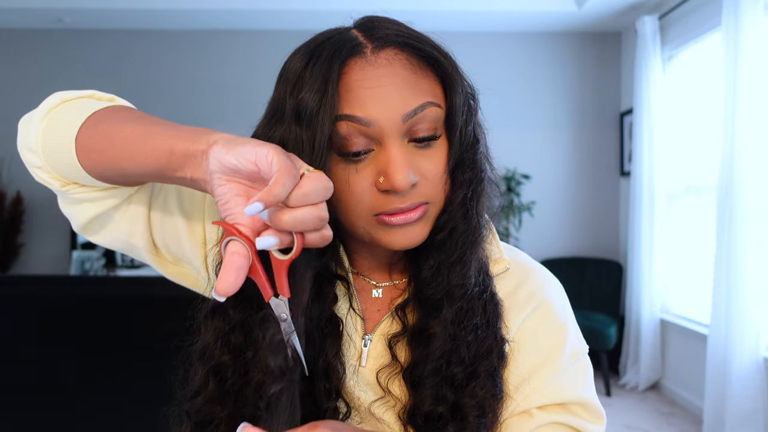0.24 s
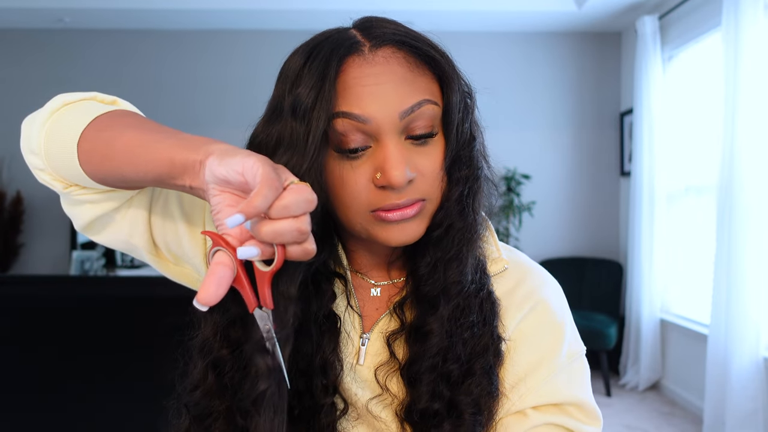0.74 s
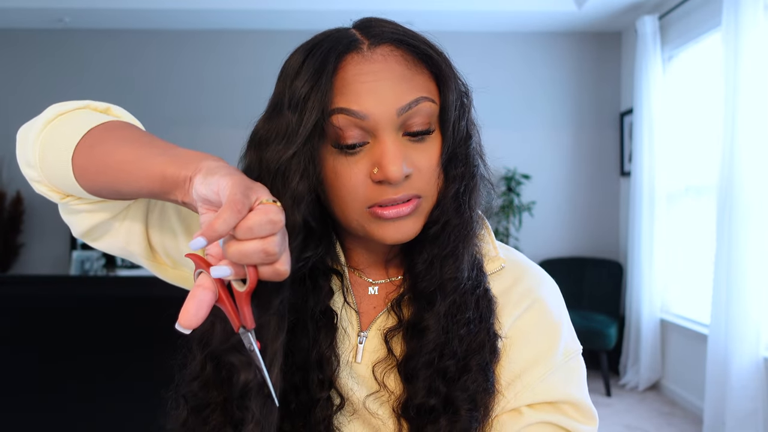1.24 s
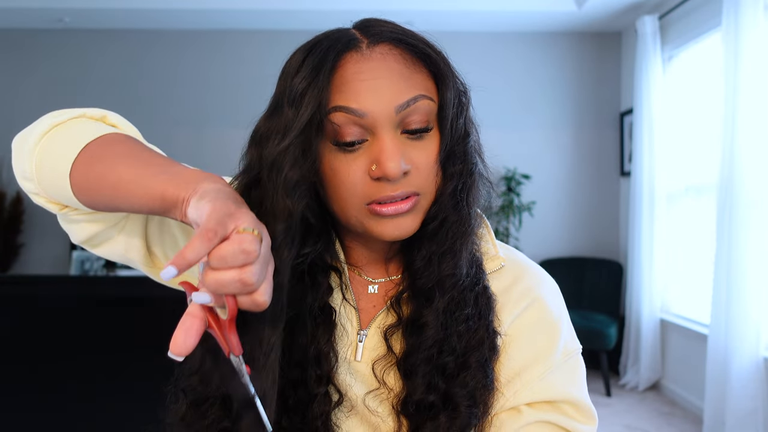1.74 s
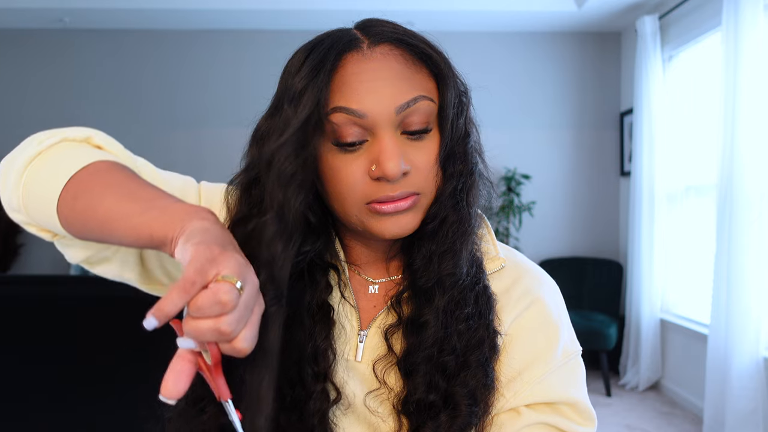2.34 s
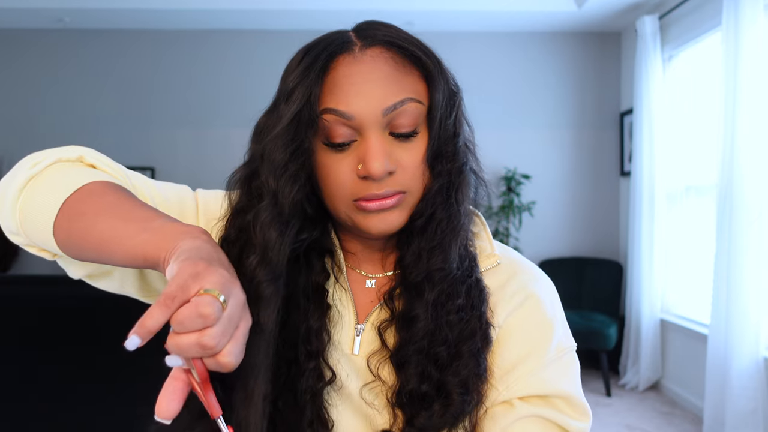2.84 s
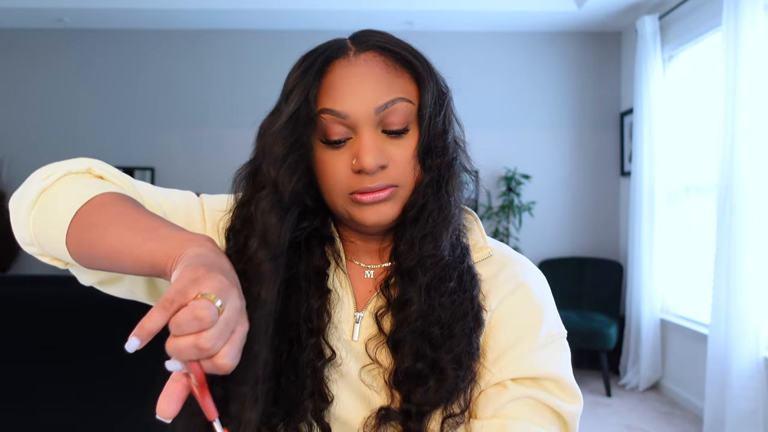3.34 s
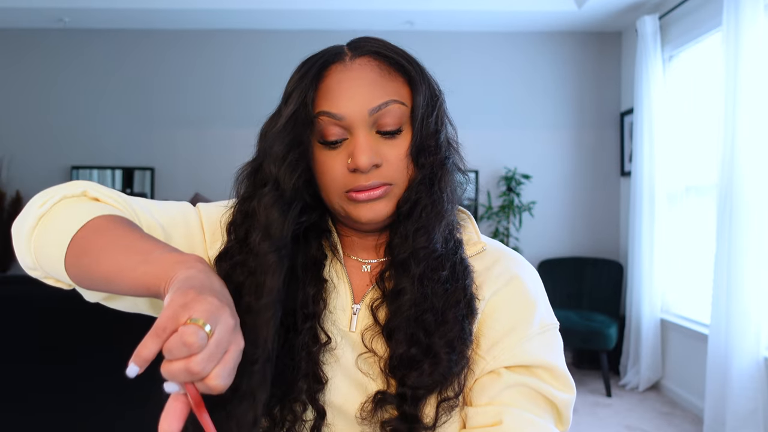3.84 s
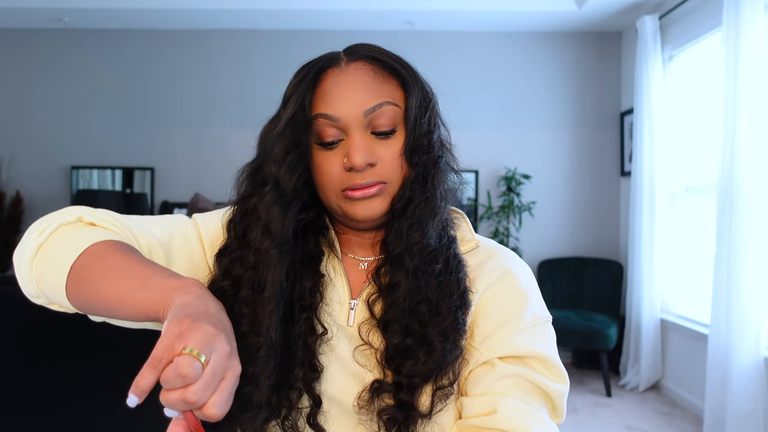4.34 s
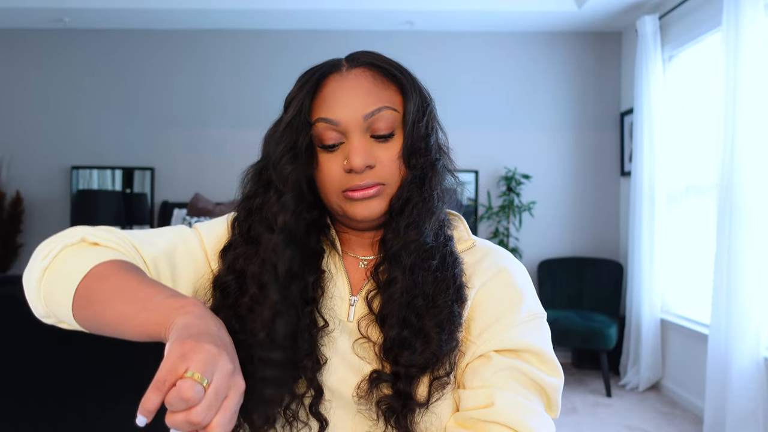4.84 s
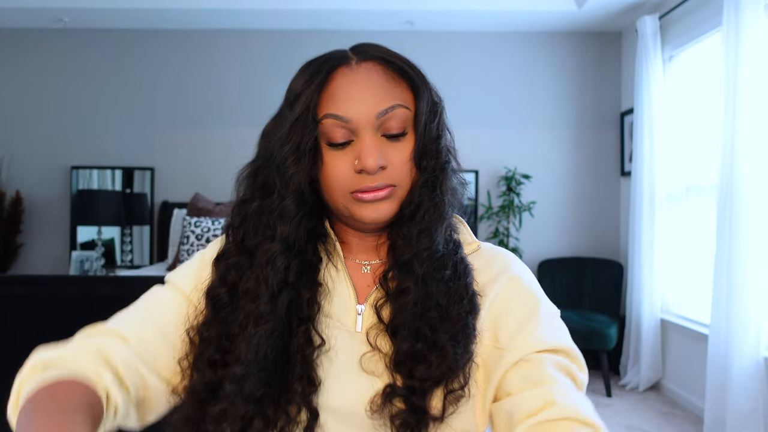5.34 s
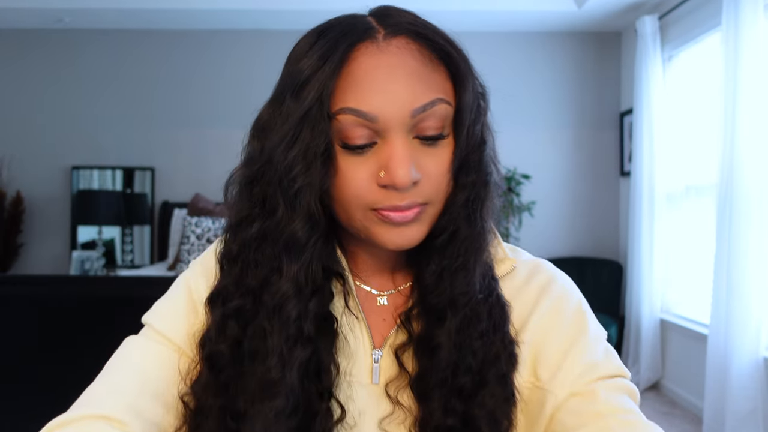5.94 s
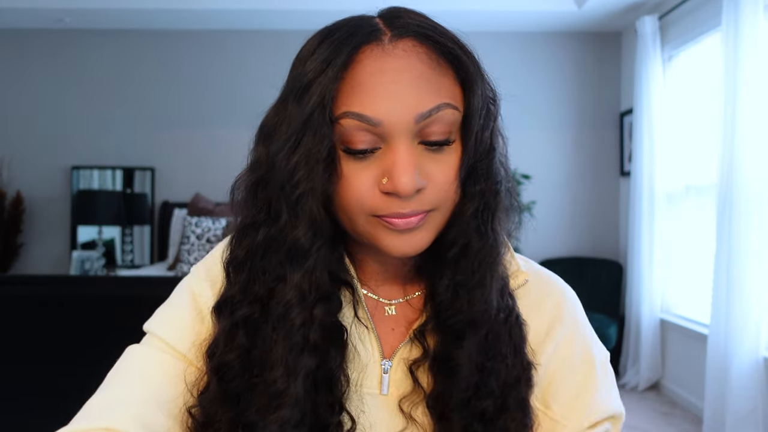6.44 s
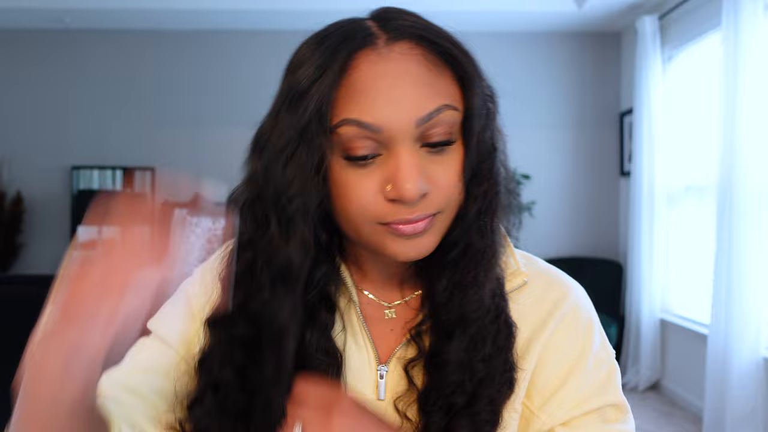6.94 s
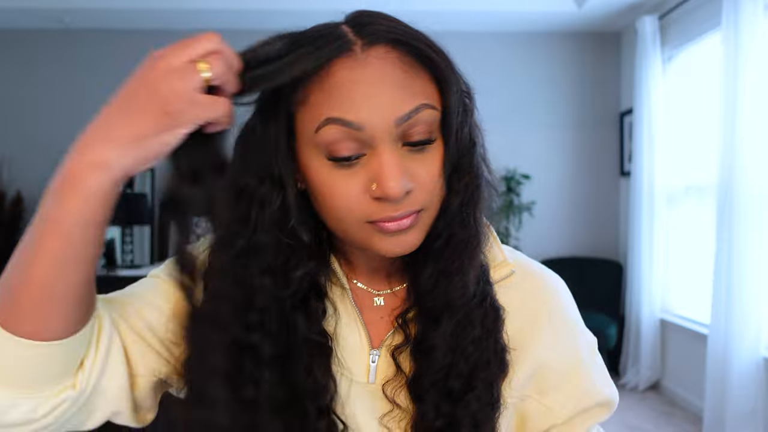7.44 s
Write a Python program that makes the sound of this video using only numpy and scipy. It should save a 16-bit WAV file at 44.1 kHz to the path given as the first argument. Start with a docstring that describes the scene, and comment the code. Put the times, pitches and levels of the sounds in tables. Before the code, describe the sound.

A quiet furnished room with soft, steady air noise and slight microphone hiss, in stereo. From 0 to about 4.9 seconds, small scissors cut long hair at arm's length, slightly left: around twenty faint, dry snips, roughly one every quarter second, each under a tenth of a second, a gritty crisp rasp of strands parting against thin ringing steel. The tone shifts gradually from airy high sizzle toward a firmer metallic bite. Tiny bright clicks of pivot and nails fall between. From 4.9 to 5.75 only room air. At 5.76 a light tap and sizzling scrape start a short uneven slide over a wooden desk, until 6.4. Knocks grow at about 6.45, 6.56 and 6.7, then a very loud hard clack at 6.82, with quick smaller bounces until 6.9 and a diffuse room tail of about half a second. Faint ticks at 7.05 and 7.38 close over quiet air.

```python
"""Small scissors close quickly again and again on long hair, an arm's length from the microphones.
Each severed strand clicks into the steel, whose resonances ring; the pivot and nails tick as dry clicks.
The place is a quiet furnished room: steady air noise, and a diffuse tail of decaying noise bands.
Later something slides over a desk as random jolts and grit through resonances, and a hard object
rattles down in four ever louder knocks with smaller bounces, each a sum of damped rings."""
import sys
import numpy as np
from scipy import signal
from scipy.fft import rfft, irfft
from scipy.io import wavfile
from scipy.ndimage import uniform_filter1d

SR = 44100
rng = np.random.default_rng(int(sys.argv[2]) if len(sys.argv) > 2 else 0)


def makeup_ratio(level_db):
    """Linear amplitude ratio for a level in decibels (20 dB per factor of ten)."""
    decades = np.asarray(level_db, float) / 20
    return 10 ** decades


def unload_wav(signal):
    """Save mono or channel-first audio to the path in sys.argv[1] as 16-bit WAV at rate SR, clipped to [-1, 1]."""
    wavfile.write(
        sys.argv[1],
        SR,
        np.round(np.clip(np.atleast_2d(signal).T, -1, 1) * 32767).astype(np.int16),
    )


N = 340011  # samples in the scene
LEFT_RIGHT = np.array([[1], [-1]])  # signs of a side signal in the two channels


def unit(x):
    """Scale to rms 1."""
    return x / np.sqrt(np.mean(x ** 2))


def even(x, span_s):
    """Scale to about rms 1 over every short stretch: a steady hand spends its force evenly."""
    local_power = uniform_filter1d(x ** 2, int(span_s * SR))
    return x / np.sqrt(local_power + 0.024 * np.mean(x ** 2))


def across(table, hz, column=1):
    """Read a column of a table whose first column is frequency, on a log-frequency axis."""
    table = np.array(table)
    return np.interp(np.log(hz + 1), np.log(table[:, 0]), table[:, column])


def ring(x, modes):
    """Sum of damped resonances with steep skirts, scaled so that white input keeps its rms."""
    response = 0
    for k, (hz, width_hz, level_db) in enumerate(modes):
        peak = signal.iirpeak(hz, hz / width_hz / np.sqrt(2), SR)
        once = signal.lfilter(*peak, signal.unit_impulse(4096))
        twice = signal.lfilter(*peak, once)
        # neighbours alternate in sign
        response = response + (-1) ** k * makeup_ratio(level_db) * twice / np.linalg.norm(twice)
    return signal.oaconvolve(x, response / np.linalg.norm(response))[:len(x)]


def crackle(rate, spread_db):
    """Random clicks, rate per second on average, a few much larger than the rest."""
    chance, sign, size = rng.random((3, N))
    height = makeup_ratio(-spread_db * np.log(size + .004))
    return unit((chance < rate / SR) * np.sign(sign - .5) * height)


def flutter(rate, depth_db):
    """Gain that wanders at random in decibels, heading for a new value rate times a second."""
    hold = int(SR / rate)
    steps = np.repeat(rng.standard_normal(N // hold + 1), hold)
    return makeup_ratio(depth_db * uniform_filter1d(steps, hold)[:N])


# spectrum of the still room and the microphone hiss: (pitch_hz, level_db per Hz, relative)
AIR_SPECTRUM = [(15, -53), (25, -33), (72, -8), (161, -0.5), (427, -1.5), (545, -3.5), (695, -2.5),
                (754, -1.5), (936, -6.5), (1190, -6), (1650, -9.5), (2000, -9.5), (4490, -17), (14800, -25),
                (16000, -31)]
# how wide that noise lies between the microphones: (pitch_hz, side_db above mid)
AIR_WIDTH = [(60, -13.5), (110, -6), (200, -4), (380, -4.5), (700, -5), (1290, -4), (2380, -5),
             (4400, -5.5), (8120, -7.5), (15000, -7.5)]
AIR_DB = -66  # rms of the mid signal


def air():
    """Steady room tone and microphone hiss: shaped noise, partly alike left and right."""
    hz = np.fft.rfftfreq(N, 1 / SR)
    mid, side = rfft(rng.standard_normal((2, N))) * makeup_ratio(across(AIR_SPECTRUM, hz))
    mid = irfft(mid, N)
    side = irfft(side * makeup_ratio(across(AIR_WIDTH, hz)), N)
    return makeup_ratio(AIR_DB) * (mid + side * LEFT_RIGHT) / np.std(mid)


# how the furnished room dies away: (pitch_hz, t60_s, side_db above mid)
ROOM_DECAY = [(150, 0.43, -21.5), (500, 0.47, -12.5), (2000, 0.54, -10), (6010, 0.51, -7), (9000, .48, -9),
              (14000, 0.4, -6.5)]


def room(x, rise_s):
    """Diffuse tail of the room: half-octave noise bands build up, then die away each at its own rate."""
    t = np.arange(SR) / SR
    tail = 0
    for hz in 90 * np.sqrt(2) ** np.arange(16):
        band = signal.butter(2, [hz / 2 ** .25, hz * 2 ** .25], "band", fs=SR, output="sos")
        fade = 1000 ** (-t / across(ROOM_DECAY, hz)) * (1 - np.exp(-t / rise_s))
        mid_side = np.array([[1], [makeup_ratio(across(ROOM_DECAY, hz, column=2))]])
        tail = tail + mid_side * signal.sosfilt(band, rng.standard_normal((2, SR))) * fade
    mid, side = signal.fftconvolve(x[None], tail / np.linalg.norm(tail[0]))[:, :N]
    return mid + side * LEFT_RIGHT


# course of the slide over the desk: (time_s, drone_db of the wood, scrape_db)
SLIDE_COURSE = [(5.76, -69, -84), (5.768, -53, -67), (5.881, -60, -65.5), (5.926, -57, -61.5),
                (6.04, -66.5, -66), (6.1, -62.5, -62.5), (6.13, -52.5, -58), (6.178, -57, -54.5),
                (6.225, -73.5, -74.5), (6.29, -71.5, -74), (6.345, -67, -64.5), (6.42, -74, -77.5),
                (6.44, -76, -76)]
# resonances, each list (pitch_hz, width_hz, level_db):
# the desk top, then the sliding object's rasp, lower scrape and high hiss
DESK_MODES = [(197.6, 83, -14), (364, 85, -6), (613, 99, 2.5), (697, 220, -1), (833, 120, -2.5),
              (1300, 480, -11)]
RASP_MODES = [(4130, 320, -3), (4420, 270, -5.5)]
SCRAPE_MODES = [(2717, 160, -6.5), (2960, 200, 2.5), (3075, 100, 3), (3460, 390, -2)]
HISS_MODES = [(5250, 300, 2), (5800, 300, -8.5), (6240, 400, -12.5)]
# sizzle as the object comes unstuck: (pitch_hz, width_hz, level_db)
BREAK_AWAY_MODES = [(5800, 352, 0.5), (5180, 300, 2)]
RASP_DB, HISS_DB, BREAK_AWAY_DB = -5.5, -8.5, 9  # above the scrape; the last at the first moment
BREAK_AWAY_S = 0.068  # time constant of the sizzle's decay


def slide():
    """Stick-slip jolts sound the desk top; finer grit rings the sliding object."""
    t = np.arange(N) / SR
    time_s, drone_db, scrape_db = np.transpose(SLIDE_COURSE)
    moving = (t >= time_s[0]) & (t < time_s[-1])
    drone = uniform_filter1d(moving * makeup_ratio(np.interp(t, time_s, drone_db)), size=90)
    scrape = uniform_filter1d(moving * makeup_ratio(np.interp(t, time_s, scrape_db)), size=90)
    jolts = even(crackle(rate=600, spread_db=0.5) * flutter(rate=54, depth_db=3), span_s=0.082)
    grit = scrape * even(crackle(rate=3000, spread_db=3.5) * flutter(rate=63, depth_db=3), span_s=.05)
    rub = ring(grit, SCRAPE_MODES)
    rub = rub + makeup_ratio(RASP_DB) * ring(grit, RASP_MODES) + makeup_ratio(HISS_DB) * ring(grit, HISS_MODES)
    unstick = makeup_ratio(BREAK_AWAY_DB) * np.exp(-np.maximum(t - time_s[0], 0) / BREAK_AWAY_S)
    return ring(drone * jolts, DESK_MODES) + rub + ring(unstick * grit, BREAK_AWAY_MODES)


# knocks and bounces on the desk: (start_s, shell_db peak, then thud_db, snap_db, crack_db, ping_db above it)
BLOWS = [(5.763, -52.5, 2.5, -1, -15, -10), (5.7806, -55, 0, -1, -22, -22),
         (6.1704, -48, -12, -8, -32, -25), (6.338, -51.5, -10, -9, -13, -14.5),
         (6.4480, -39, -8, -36.5, -38, -40), (6.549, -39.5, -4.5, -21.5, -29.5, -32.5),
         (6.558, -28, -19, -20.5, -35, -37.5), (6.6965, -22.5, -15, -10.5, -23.5, -15.5),
         (6.7281, -26.5, -11.5, -8, -18, -15.5), (6.7552, -28, -19, -14, -31.5, -30.5),
         (6.8232, -5.5, -21.5, -8, -10.5, -17), (6.8423, -24, -19, -11, -15.5, -22),
         (6.8504, -26, -17.5, -12.5, -17, -20.5), (6.878, -12.5, -22, -6, -22, -25),
         (6.9043, -21.5, -15.5, -18.5, -23, -28.5)]
# what the knocked object rings with, low to high, each list (pitch_hz, width_hz, level_db)
THUD_MODES = [(164, 99, -22), (360, 210, -6), (440, 85, -1.5), (690, 530, 2), (850, 160, 2),
              (1032, 140, -5)]
SHELL_MODES = [(1460, 190, -6), (1720, 110, -2), (2006, 550, -13.5), (2240, 470, -1), (2584, 200, 0),
               (2830, 270, 1), (3174, 150, -2), (3480, 240, -6)]
CLANK_MODES = [(4213, 460, -3), (4620, 500, 0.5), (4960, 250, -3), (5060, 330, -1.3)]
SNAP_MODES = [(5770, 900, 5), (6240, 160, -2), (6570, 320, -3.5)]
CRACK_MODES = [(7070, 600, 0.5), (8230, 700, -6)]
PING_MODES = [(9400, 920, -3.5), (10700, 990, -0.5), (12600, 2500, -8), (14500, 2500, -15)]
CLANK_DB, CLANK_PER_SNAP = -3.5, .55  # a harder contact raises the clank about half as much as the snap
JOLT_DB, JOLT_S = -58, .005  # against the blow's shell_db; time at which the push peaks


def knocks():
    """Blows ring one body, harder contact reaching higher modes; returns clean and chattering blows."""
    t = np.arange(4000) / SR
    groups = (SHELL_MODES, THUD_MODES, CLANK_MODES, SNAP_MODES, CRACK_MODES, PING_MODES)
    lags_s = (0.00054, 0.00021, 0.0017, 0.00093, 0.0019, 0.00058)  # the parts land a moment apart
    parts = np.array([ring(1. * (t >= lag) * (t < lag + 1 / SR), modes)
                      for lag, modes in zip(lags_s, groups)])
    parts = parts / np.abs(parts).max(axis=1, keepdims=True)
    chatter_fade = np.exp(-t / 0.0046) * (1 - np.exp(-t / 0.0019))
    push = t / JOLT_S * np.exp(1 - t / JOLT_S)
    clean, rough = np.zeros((2, N))
    grains = rng.standard_normal((len(BLOWS), len(t)))
    for (start_s, shell_db, thud_db, snap_db, crack_db, ping_db), grain in zip(BLOWS, grains):
        clank_db = CLANK_DB + CLANK_PER_SNAP * snap_db
        above_db = np.array([0, thud_db, clank_db, snap_db, crack_db, ping_db])
        blow = makeup_ratio(shell_db + above_db) @ parts
        # loose contact and desk reflections
        chatter = np.convolve(blow, grain * chatter_fade)[:len(t)]
        # the desk passes each blow to the microphone stand as a soft push
        jolt = makeup_ratio(shell_db + JOLT_DB) * push
        start = int(start_s * SR)
        clean[start:][:len(t)] += blow
        rough[start:][:len(t)] += 0.95 * blow + 0.14 * chatter + jolt
    return clean, rough


# pivot and nail ticks, close and dry: (start_s, edge_db peak, edge pitch_hz, body_db above the edge)
TICK_TIMES = [(0.2084, -57, 9880, -14), (0.249, -47, 9910, -17), (0.4569, -55, 9230, -12),
              (0.9454, -54, 8740, -9), (1.2114, -50, 10300, -13), (1.282, -50, 12000, -7),
              (1.5324, -57, 10700, -6), (1.8685, -52, 7400, -9), (1.8825, -52, 7400, -12),
              (2.0800, -52, 7180, 4), (2.2996, -47.5, 6660, -8), (2.4005, -55, 7200, -7),
              (2.5651, -52, 7050, -9), (2.6529, -51, 11200, -5), (2.6675, -53, 7200, -3),
              (2.953, -53, 11300, -7), (3.2, -46, 7060, -10), (3.439, -48.5, 6600, -11),
              (3.7219, -48.5, 7240, -14), (3.8162, -51, 7910, -3), (4.113, -49, 7410, -2),
              (4.782, -46.5, 7200, -11), (4.842, -50, 7240, -3), (4.8703, -49.5, 5000, -0.5),
              (7.0514, -54, 12000, -19), (7.0549, -48, 12000, -19), (7.3734, -53, 5590, -14),
              (7.3826, -57, 7800, -13)]
# what the shank and grip of the scissors ring with, each list (pitch_hz, width_hz, level_db)
SHANK_MODES = [(3270, 1160, 5.5), (4050, 630, 5.5), (4470, 590, -2), (5700, 1100, -9)]
GRIP_MODES = [(1650, 560, -0.91), (1800, 260, -1.9), (2290, 560, 0.46)]


def ticks():
    """Single dry clicks: a bright edge over a short ring of shank and grip."""
    out = np.zeros(N)
    click = signal.unit_impulse(800)
    body = ring(click, GRIP_MODES) + ring(click, SHANK_MODES)
    body = body / np.abs(body).max()
    for start_s, edge_db, pitch_hz, body_db in TICK_TIMES:
        edge = ring(click, [(pitch_hz, 2200, 0)])
        edge = edge / np.abs(edge).max()
        out[int(start_s * SR):][:800] += makeup_ratio(edge_db) * (edge + makeup_ratio(body_db) * body)
    return out


# one row a bite of the blades, an arm's length away:
# (start_s, length_s, shank_db, swell_db from first grip to closing, tip_db above the shank)
BITES = [(-.01, 0.079, -63.5, 3, 3.5), (0.214, 0.099, -60.5, 10, 6.5), (0.459, 0.079, -65, 4.5, 4),
         (0.711, 0.078, -66, 3, -1), (0.967, 0.039, -61.5, 7, -4), (1.006, 0.036, -63.5, -4, -2.5),
         (1.212, 0.12, -68, 1.5, -1.5), (1.535, 0.058, -60.5, 5.5, -4), (1.802, 0.079, -58, 2.5, -6.5),
         (2.067, 0.067, -60.5, 0.5, -9), (2.321, 0.072, -64, 1, -12), (2.604, 0.081, -67, 1, -6),
         (2.894, 0.083, -61.5, 0.5, -7), (3.162, 0.1, -60.5, 1.5, -7.5), (3.465, 0.097, -58, 3.5, -9.5),
         (3.745, 0.1, -62.5, -1, -11.5), (4.037, .085, -60.5, 4.5, -10), (4.305, 0.11, -63, -4, -11.5),
         (4.558, 0.049, -63.5, -1, -14), (4.603, 0.042, -62, -6, -15), (4.797, 0.059, -70, 2, -12)]
# the hand sinks and turns, so the parts are heard differently:
# (time_s, blade_db above the shank, edge_db above the tip, point_db above the tip)
HAND_TURN = [(0, -11, -8, -8), (.3, -8, -7, -7), (.75, -13, -1.5, -1), (1.0, -12, -1, -10),
             (1.55, -14, -8, -13), (1.85, -5.5, -1.5, -16), (2.35, -5, 0, -16), (3.0, -4.5, 1, -19),
             (3.5, -6.5, -2, -16), (3.8, 0.5, -1, -13), (4.1, -3.5, 0, -13), (4.6, 1.8, -3, -10.5),
             (4.85, -2.5, -7, -10.5)]
# gain from start to end of a snip as the cutting point travels outward:
# (shank_db, grip_db, blade_db, tip_db, edge_db, point_db)
OUTWARD_DB = (-1, -11, 13, -1.5, 2, -10)
BITE, CLOSE = 0.32, 0.68  # shares of a snip: blades have gripped, lock is nearly through
START_DB, END_DB = -9, -17.5  # at either end of a snip; the start lies below the first grip
GRIP_DB = -4.5  # above the shank


def snip_gains():
    """Gain curves of shank, grip, blade, tip, edge and point: each snip grips, swells and lets go."""
    t = np.arange(N) / SR
    out = 0
    turn_s, *turn_db = np.transpose(HAND_TURN)
    for start_s, length_s, shank_db, swell_db, tip_db in BITES:
        progress = (t - start_s) / length_s
        top = max(swell_db, 0)  # a rising swell ends at shank_db, a falling one begins there
        swell = np.interp(progress, [0, BITE, CLOSE, 1], [START_DB - top, -top, swell_db - top, END_DB])
        blade_db, edge_db, point_db = (np.interp(start_s, turn_s, db) for db in turn_db)
        above_db = np.array([0, GRIP_DB, blade_db, tip_db, tip_db + edge_db, tip_db + point_db])
        travel = np.outer(OUTWARD_DB, np.clip(progress, 0, 1) - .5)
        cutting = (progress >= 0) & (progress < 1)
        out = out + cutting * makeup_ratio(shank_db + swell + above_db[:, None] + travel)
    return uniform_filter1d(out, size=90)


# what the outer parts of the scissors ring with, each list (pitch_hz, width_hz, level_db)
BLADE_MODES = [(6780, 820, 5.7), (7050, 260, 7.2), (7330, 570, 5)]
TIP_MODES = [(9860, 300, -0.5), (10630, 1800, 2), (11640, 890, 0)]
EDGE_MODES = [(11600, 1500, -3), (13300, 680, 2.5), (14300, 900, -12), (15200, 700, -5.5)]
POINT_MODES = [(9120, 610, 0.5)]


def scissors():
    """Strands part in clumps, a patter that all the steel shares; each part also has its own grit."""
    out = 0
    steel = (SHANK_MODES, GRIP_MODES, BLADE_MODES, TIP_MODES, EDGE_MODES, POINT_MODES)
    strands = crackle(rate=3300, spread_db=3.0) * flutter(rate=130, depth_db=4.5)
    for gain, modes in zip(snip_gains(), steel):
        grit = crackle(rate=1700, spread_db=3.5) * flutter(rate=64, depth_db=3.5)
        cut = gain * even(strands + 0.73 * grit, span_s=0.033)
        cut = cut / np.linalg.norm(makeup_ratio(np.array(modes)[:, 2]))
        # each resonance swells and fades at random, so the colour of the snips keeps shifting
        for k, mode in enumerate(modes):
            fed = cut * flutter(rate=14, depth_db=2.5)
            out = out + (-1) ** k * makeup_ratio(mode[2]) * ring(fed, [mode])
    return out


def scene():
    """The scissors are near and dry; the desk lies below the microphones and is wetter."""
    near = scissors() + ticks()
    rub = slide()
    clean, rough = knocks()
    wet = room(makeup_ratio(-10.5) * near + makeup_ratio(-3.5) * rub + makeup_ratio(1.93) * clean, rise_s=0.01)
    # scissors and slide sit slightly left, the knocks slightly right
    direct = (near + rub) * makeup_ratio(0.74 * LEFT_RIGHT) + rough * makeup_ratio(-.3 * LEFT_RIGHT)
    return direct + wet + air()


def roll_off(x):
    """The treble ends steeply here."""
    return signal.sosfilt(signal.butter(12, 16480, fs=SR, output="sos"), x)


def record(dry):
    """The finished mix as the camera keeps it."""
    return roll_off(dry)


dry = scene()
out = record(dry)
unload_wav(out)
```